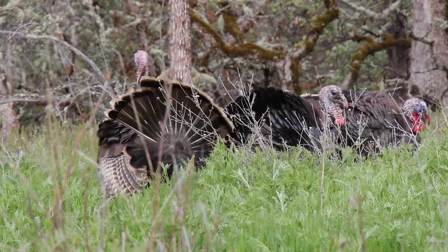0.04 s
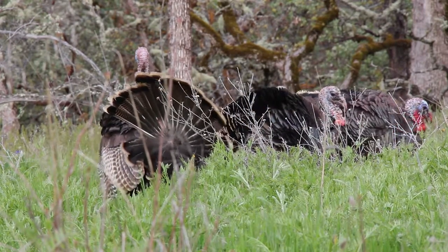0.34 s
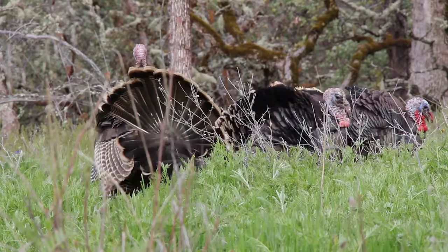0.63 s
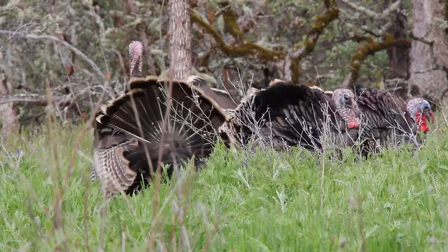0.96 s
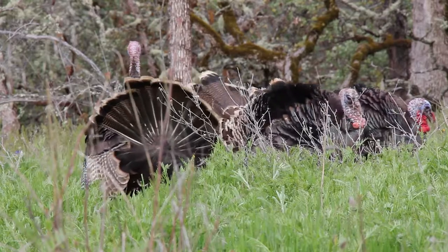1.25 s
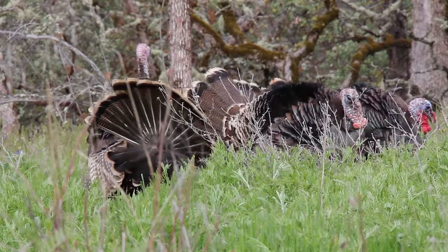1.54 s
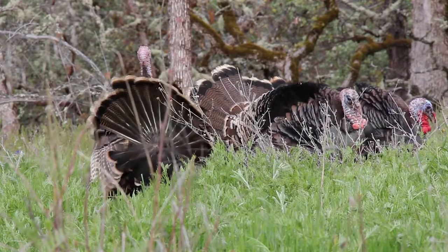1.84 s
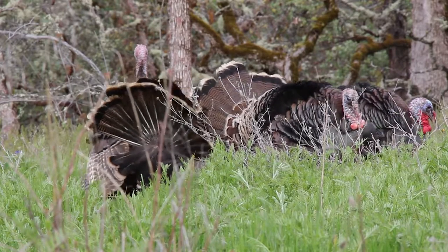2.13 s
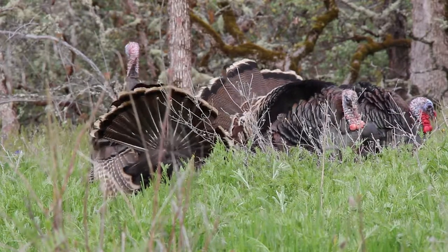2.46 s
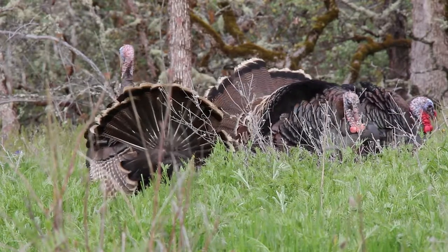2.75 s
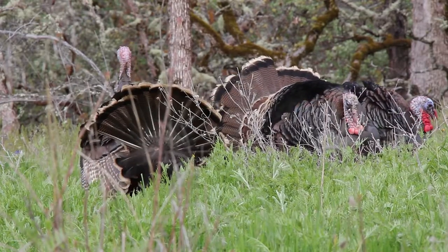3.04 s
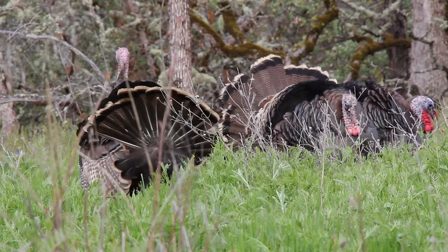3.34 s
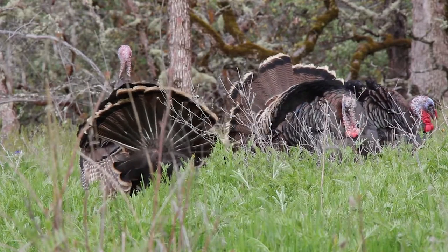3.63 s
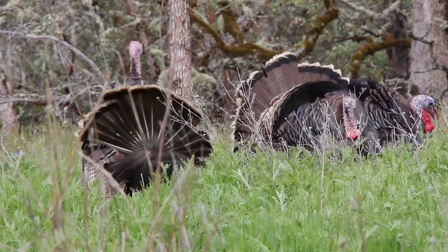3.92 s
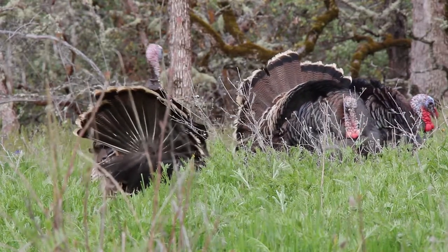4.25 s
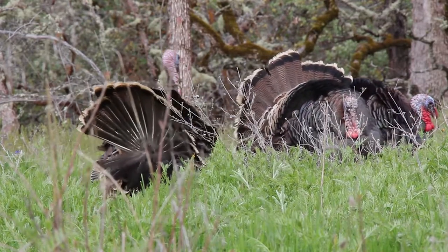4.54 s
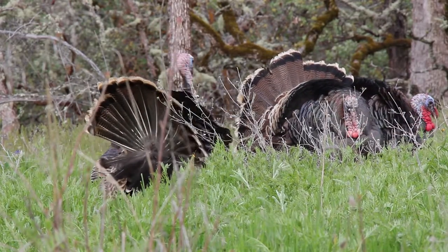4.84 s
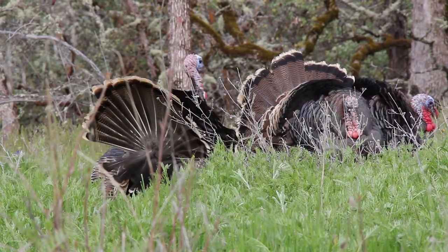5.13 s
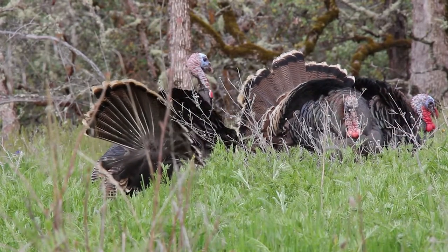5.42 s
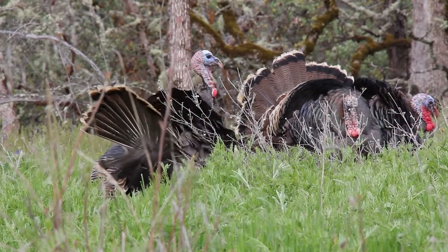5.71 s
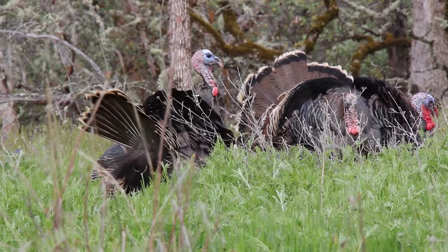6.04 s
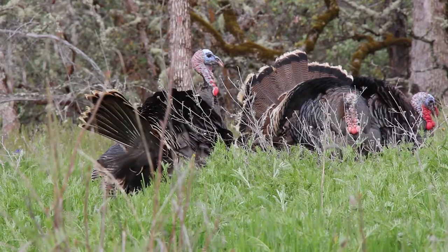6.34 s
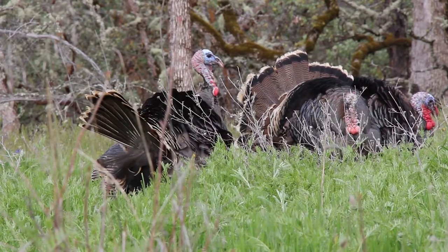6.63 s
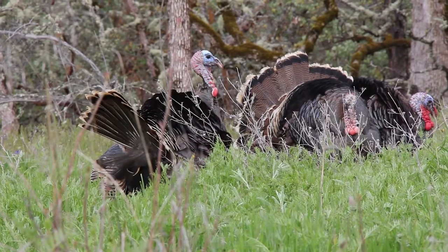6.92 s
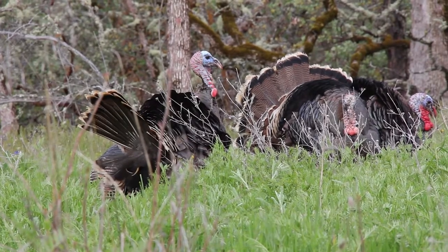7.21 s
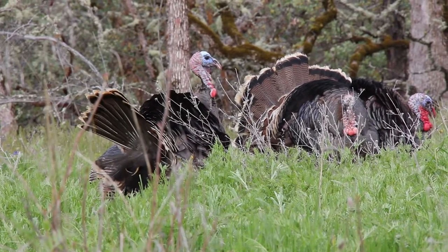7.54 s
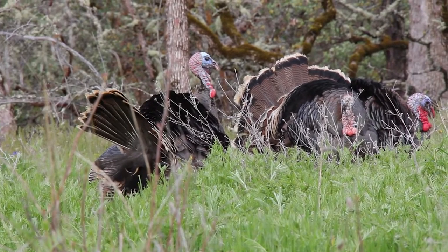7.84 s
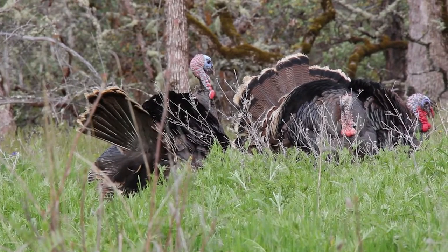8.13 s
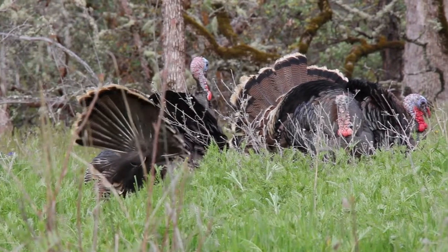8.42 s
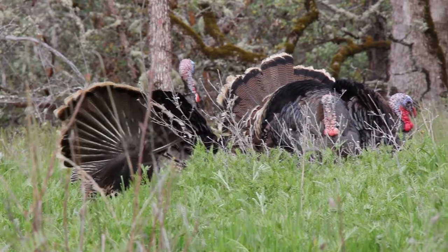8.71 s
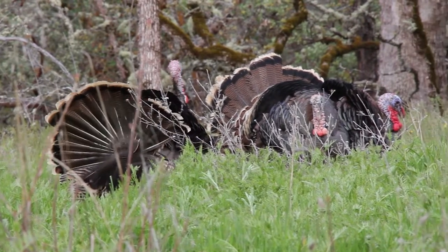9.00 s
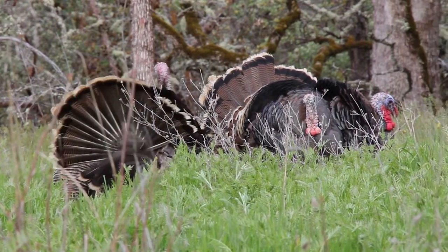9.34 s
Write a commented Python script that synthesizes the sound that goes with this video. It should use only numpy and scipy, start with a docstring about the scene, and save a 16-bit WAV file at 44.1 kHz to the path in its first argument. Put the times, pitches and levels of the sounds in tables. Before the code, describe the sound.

Close, dry clicks, like the fittings of a stand being adjusted, come first as one snap and then as three quick, rattling bunches. After them comes one barely heard thump, and the woodland clearing is left to thin, far-off whistles and hoarse chirps from small birds. Soft distant air continues throughout, with a slight hum and a very faint electrical whine.

```python
"""At the grassy edge of a wood, something hard, probably a stand and its fittings, is shifted close by.
Its catches let go in four clusters of dry clicks, the parts scrape as they slide on, and they ring faintly.
Small birds whistle and rasp far off, and tree trunks echo both the clicks and the birds.
Under it all lie a rush of distant air, a low hum, a thin electrical whine and one soft thump."""
import sys
import numpy as np
from scipy import signal
from scipy.fft import rfft, irfft, next_fast_len
from scipy.io import wavfile
from scipy.ndimage import uniform_filter1d

SR = 44100
rng = np.random.default_rng(int(sys.argv[2]) if len(sys.argv) > 2 else 0)


def transcribe(u):
    """Save the signal u as a 16-bit wav file named by the first command-line argument.

    u: samples, shape (n,) or (channels, n), limited to [-1, 1]; the rate is SR.
    q: integer samples, one column per channel.
    """
    v = np.clip(np.atleast_2d(u).T, -1, 1)
    q = np.round(v * 32767).astype(np.int16)
    wavfile.write(sys.argv[1], SR, q)


N = 413201
TIME = np.arange(N) / SR


def gain(db):
    """Turn decibels into a number to multiply by."""
    return 10 ** (np.asarray(db) / 20)


def unit(x):
    """Scale a signal so its average size (rms) is 1."""
    return x / np.sqrt(np.mean(x ** 2))


def add(track, start_s, sound):
    """Mix a sound into a track at the given time."""
    i = int(start_s * SR)
    track[i:i + len(sound)] += sound[:len(track) - i]


def fade(t, t60):
    """Die away by 60 dB every t60 seconds."""
    return np.exp(-np.log(1000) * t / t60)


def drift(rate):
    """Wander smoothly around zero, with `rate` random turns a second."""
    step = int(SR / rate)
    turns = rng.standard_normal(N // step + 2)
    path = np.interp(TIME * rate, np.arange(len(turns)), turns)
    return unit(uniform_filter1d(path, step))


def colour(x, points, bass_db=0, treble_db=0, peak_hz=3000, peak_db=0):
    """Filter through (pitch [Hz], level [dB]) points, with extra bass, treble and one broad peak."""
    n = next_fast_len(len(x) // 2 + 1024) * 2
    hz = np.arange(n // 2 + 1) * SR / n + 1
    point_hz, point_db = np.transpose(points)
    db = np.interp(np.log(hz), np.log(point_hz), point_db)
    db += bass_db / (1 + (hz / 1250) ** 4) + treble_db / (1 + (4800 / hz) ** 4)
    db += peak_db * (np.exp(-(np.log2(hz / peak_hz) / .49) ** 2) - .5)
    # fold the filter so that it never sounds before its input does
    cepstrum = irfft(np.log(gain(db)))
    cepstrum[1:n // 2] *= 2
    cepstrum[n // 2 + 1:] = 0
    return irfft(rfft(x, n) * np.exp(rfft(cepstrum)))[:len(x)]


# tone colour of the distant air: (pitch [Hz], relative level [dB])
RUSH_COLOUR = [(100, -19), (170, -1.5), (211, -0.5), (256, -1.5), (786, -2), (1080, -4.5), (1160, -5),
               (1330, -4.5), (1750, -10), (2600, -13.2), (2990, -14.5), (3270, -13.5), (3510, -14.5),
               (8110, -21.5), (12000, -27.5), (15600, -55.5), (22000, -120)]
# tone colour of the rumble: (pitch [Hz], relative level [dB])
RUMBLE_COLOUR = [(12, -14), (28, -10), (50, 4), (75, 5), (110, 1), (150, 1), (190, -7), (300, -37)]


def air(rush_db=-54.5, rumble_db=-60, lull_db=-.56, lull_s=2.8):
    """Far-off air rushes over a low rumble, picking up from a slight lull."""
    rush = unit(colour(rng.standard_normal(N), RUSH_COLOUR)) * gain(rush_db)
    rumble = unit(colour(rng.standard_normal(N), RUMBLE_COLOUR)) * gain(rumble_db)
    return rush * gain(lull_db * np.exp(-TIME / lull_s)) + rumble


# steady tones: (pitch [Hz], level [dB], pitch wander [Hz])
HUM_TONES = [(75.4, -72, 1.87), (93.4, -75, 1.7), (119.8, -59.5, 0.45), (139, -70.5, 0.53),
             (1200, -65.5, 2.295), (3216, -73.5, 2.07)]


def hum():
    """A machine hums low and thin electrical tones whine, each wavering a little."""
    out = np.zeros(N)
    for hz, db, wander_hz in HUM_TONES:
        loudness = np.sqrt(2) * gain(db + .9 * drift(3.72))
        pitch = hz + wander_hz * drift(7)
        out += loudness * np.sin(2 * np.pi * np.cumsum(pitch) / SR)
    return out


# clicks of the fittings; a heavier part has more bass:
# (time [s], strength [dB], bass [dB], treble [dB], pitch of the part [Hz])
FITTING_CLICKS = [(0.7739, -15.8, -16, -7.5, 3500), (0.8033, -36.5, -2, -6, 3100),
                  (0.8787, -32.5, -1, 0.5, 3550), (2.1102, -35.5, 5, -8, 2100), (2.2527, -25, 4, 5, 2270),
                  (2.2861, -15.9, 2.5, 1.5, 4170), (2.3064, -22, 1, -6, 1980), (2.321, -22, -7, 2, 2620),
                  (3.3224, -24.5, -9, 4, 2700), (3.3365, -32, -7, -4, 2500), (3.3712, -27, -4, -10, 1300),
                  (3.4065, -24, 0, -4, 1260), (3.4416, -26, -3, -6, 2920), (3.496, -24, -4.5, -3, 2930),
                  (3.5223, -25.5, -3.5, 6, 2480), (3.771, -34, -2, 1, 2630), (3.7797, -27, -1, 3.5, 2420),
                  (3.8505, -21, -4, 2.5, 3020), (3.8798, -21.7, 1.5, 1, 3530)]
# tone colour of clicks and scrapes: (pitch [Hz], relative level [dB])
FITTING_COLOUR = [(100, -29), (240, 3.5), (360, 0.5), (480, 3), (680, -7), (1050, 0), (1450, -3), (2050, 0),
                  (2900, -2), (3500, -6), (4100, -3.5), (7000, -9), (9000, -15.5), (12000, -31)]


def clicks(boost_db=11, full_snap_db=-17):
    """A catch lets go with a snap; the parts chatter and sing briefly, then shiver out."""
    out, t = np.zeros(N), np.arange(SR // 4) / SR
    for start_s, db, bass_db, treble_db, hz in FITTING_CLICKS:
        peak_db = 6.5 - .4 * bass_db  # light parts ring more sharply
        shiver = gain(-31) * fade(t, t60=.22)
        chatter = rng.standard_normal(len(t)) * (gain(-14) * fade(t, t60=.028) + shiver)
        # a hard release puts more force into the first instant, too brief to move the heavy parts
        hardness = gain(.47 * min(db - full_snap_db, 0))
        snap = 2.98 * hardness * (t == 0)
        click = colour(snap, FITTING_COLOUR, bass_db - 9, treble_db, hz, peak_db)
        click += colour(chatter / np.sqrt(hardness), FITTING_COLOUR, bass_db, treble_db, hz, peak_db)
        click += gain(-29.5) * fade(t, t60=.045) * np.sin(2 * np.pi * hz * t)
        add(out, start_s + .0008, gain(db + boost_db) * click)
    # stiff parts spread each snap over a few swings (two all-pass filters)
    return signal.sosfilt([[.6, -1.3, 1, 1, -1.3, .6], [.7, -1.55, 1, 1, -1.55, .7]], out)


# rubs that no click sets off: (peak time [s], swell time [s], level [dB], bass [dB])
LONE_RUBS = [(2.106, .024, -47.5, 0.5), (3.402, 0.012, -47.3, -3)]


def scrapes(lag_s=.03, slide_swell_s=.019, slip_chance=.2):
    """Many tiny slips swell and die as the parts rub, or slide on after a click."""
    out, t = np.zeros(N), np.arange(-SR // 6, SR // 6) / SR
    # stronger clicks and heavier parts scrape louder
    slides = [(start_s + lag_s, slide_swell_s, db - 24 + .67 * bass_db, bass_db)
              for start_s, db, bass_db, _, _ in FITTING_CLICKS]
    for peak_s, swell_s, db, bass_db in slides + LONE_RUBS:
        slips = rng.standard_normal(len(t)) * (rng.random(len(t)) < slip_chance)
        scrape = unit(colour(slips, FITTING_COLOUR, bass_db, treble_db=-3, peak_hz=2400, peak_db=3))
        add(out, peak_s + t[0], scrape * gain(db) / np.cosh(t / swell_s))
    return out


# notes the fittings ring with: (pitch [Hz], relative level [dB], time to fade by 60 dB [s])
RING_NOTES = [(1020, -3, .3), (1250, -2, .16), (1710, -7, .35), (1868, -7, .35), (2060, -6, .22),
              (2234, -5, .3), (2680, -7, .2), (2950, -6, .12), (3670, -7.5, .26), (4035, -5, .16),
              (5220, -4, .12), (7050, -2, .08)]


def ring(contact, ring_db=-50):
    """Every click and scrape leaves the fittings ringing faintly."""
    t = np.arange(SR) / SR
    notes = sum(gain(db) * fade(t, t60) * np.sin(2 * np.pi * hz * t) for hz, db, t60 in RING_NOTES)
    return gain(ring_db) * signal.fftconvolve(contact, notes)[:N]


def woods(sound, echo_db, t60):
    """Tree trunks scatter a sound, adding a thin, late echo with little bass or treble."""
    t = np.arange(2 * SR) / SR
    echo = colour(rng.standard_normal(len(t)), [(200, -12), (1000, 0), (4000, -4.5), (10000, -6.5)])
    echo *= fade(t, t60) * (1 - fade(t, .11))  # builds up, then dies away
    return sound + gain(echo_db) * signal.fftconvolve(sound, echo / np.linalg.norm(echo))[:N]


def bird_note(start_s, length_s, from_hz, to_hz, db, glide_s, wobble):
    """One note swells and fades while its wobbling pitch eases to a new value."""
    t, i = np.arange(int(length_s * SR)) / SR, int(start_s * SR)
    hz = from_hz + (to_hz - from_hz) * np.expm1(-t / glide_s) / np.expm1(-length_s / glide_s)
    hz *= 1 + wobble[i:i + len(t)]
    swell = np.sqrt(np.sin(np.pi * t / length_s))
    return gain(db) * unit(swell * np.sin(2 * np.pi * np.cumsum(hz) / SR))


# one hoarse falling call: (time [s], length [s], start pitch [Hz], end pitch [Hz], level [dB])
BIRD_SQUAWK = (1.522, 0.12, 3203, 2251, -61.3)
# clear whistles: (time [s], length [s], start pitch [Hz], end pitch [Hz], level [dB])
BIRD_WHISTLES = [(3.117, 0.043, 3900, 3800, -59.5), (3.168, .13, 3760, 3710, -62.8),
                 (6.11, .15, 5600, 4160, -59.5), (6.3, .1, 4230, 4110, -68), (6.42, 0.072, 4100, 3980, -62),
                 (6.901, 0.37, 3280, 3780, -70.5), (6.928, .33, 3980, 4460, -76),
                 (7.62, 0.14, 3200, 3310, -70), (8.41, .06, 5000, 4600, -74), (8.52, .05, 4200, 4130, -71),
                 (8.92, .1, 3900, 3770, -66.5), (9.16, .1, 3510, 3320, -64),
                 (9.276, .13, 3330, 3500, -62.5)]
# repeats of one hoarse rising chirp: (time [s], level [dB])
BIRD_CHIRPS = [(5.556, -68), (6.73, -67), (7.99, -66)]


def birds(drop_s=.035, climb_s=.19, hoarse_glide_s=.202, flicker_db=2.2):
    """Small birds whistle clearly and call hoarsely; their sound flickers through the trees."""
    out = np.zeros(N)
    tremble, rasp = np.tile(drift(90), 2), np.tile(drift(700), 2)  # a very fast wobble sounds hoarse
    add(out, BIRD_SQUAWK[0], bird_note(*BIRD_SQUAWK, hoarse_glide_s, .074 * rasp))
    for start_s, length_s, from_hz, to_hz, db in BIRD_WHISTLES:
        glide_s = drop_s if to_hz < from_hz else climb_s
        add(out, start_s, bird_note(start_s, length_s, from_hz, to_hz, db, glide_s, .007 * tremble))
    for start_s, db in BIRD_CHIRPS:
        chirp = bird_note(start_s, length_s=.0543, from_hz=2150, to_hz=2700, db=db,
                          glide_s=hoarse_glide_s, wobble=.03 * rasp)
        add(out, start_s, chirp)
    return out * gain(flicker_db * drift(45))


def thump(peak_s=4.78, swell_s=.04, db=-51):
    """Deep noise swells for a moment into one soft thump."""
    swell = 1 / (1 + ((TIME - peak_s) / swell_s) ** 2)
    deep_noise = colour(rng.standard_normal(N), [(15, -14), (35, -12), (65, 2), (100, -7), (220, -54)])
    return unit(deep_noise) * gain(db) * swell


def scene():
    """Mix the near fittings, far birds and background, the same in both ears."""
    contact = clicks() + scrapes()
    fittings = woods(contact + ring(contact), echo_db=-16.5, t60=1.23)
    far_birds = woods(birds(), echo_db=-9, t60=.7)
    mono = fittings + far_birds + hum() + air() + thump()
    return np.array([mono, mono])


def record(dry):
    """Cut the highest treble steeply, above 11850 Hz."""
    return signal.sosfilt(signal.ellip(10, .2, 70, 11850, fs=SR, output="sos"), dry)


dry = scene()
out = record(dry)
transcribe(out)
```